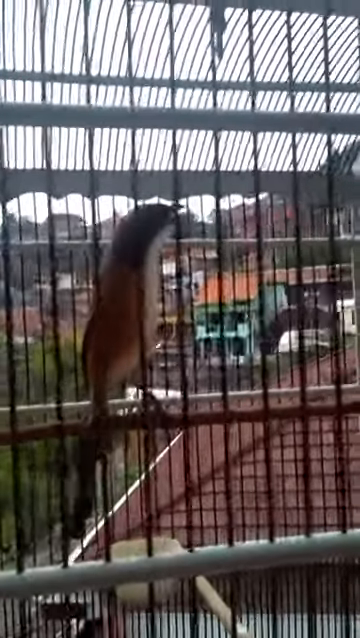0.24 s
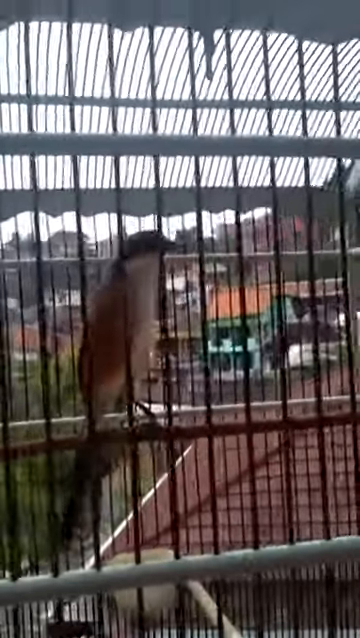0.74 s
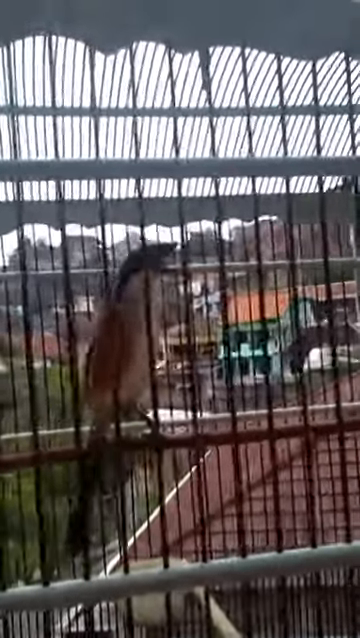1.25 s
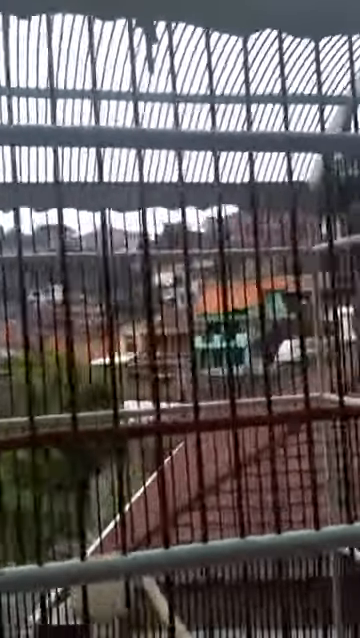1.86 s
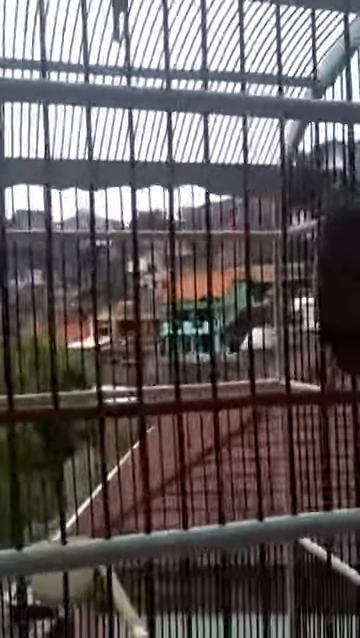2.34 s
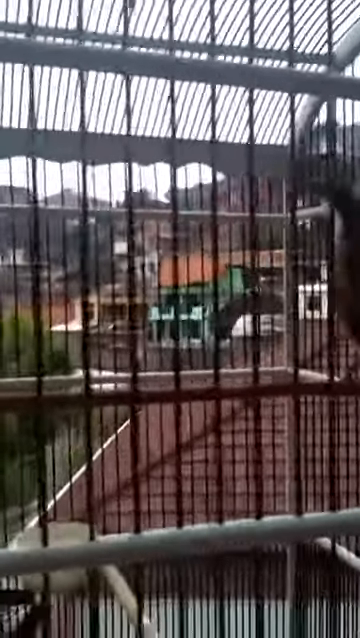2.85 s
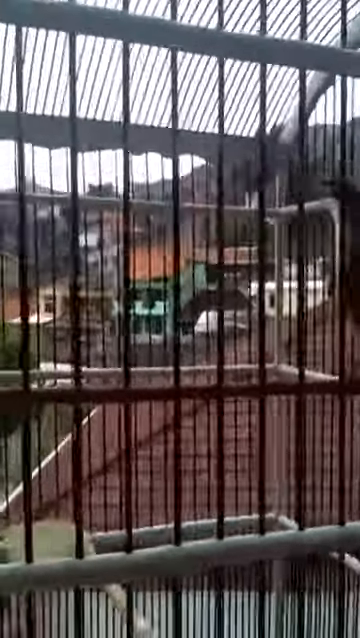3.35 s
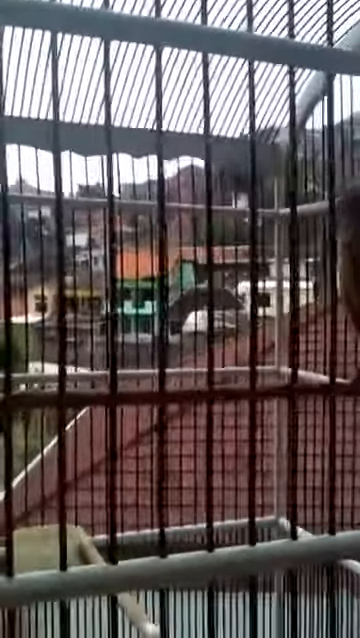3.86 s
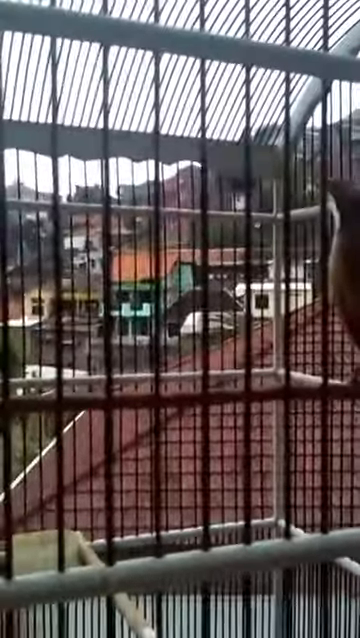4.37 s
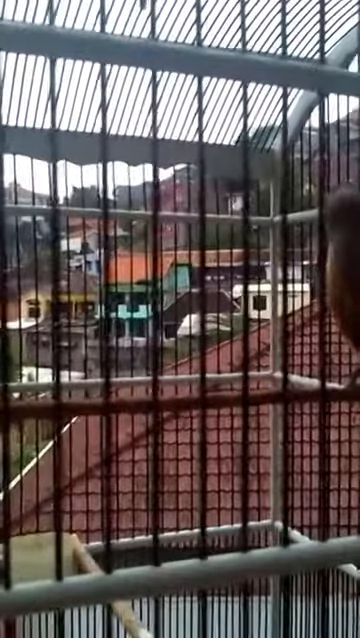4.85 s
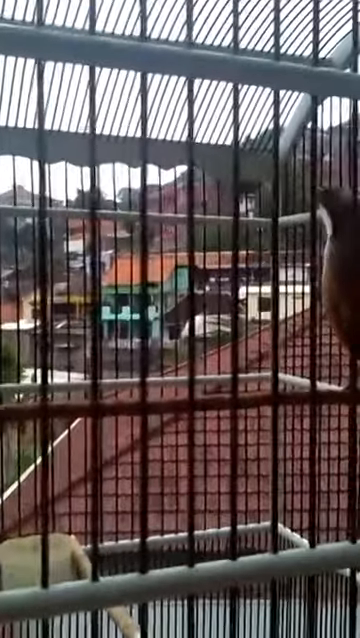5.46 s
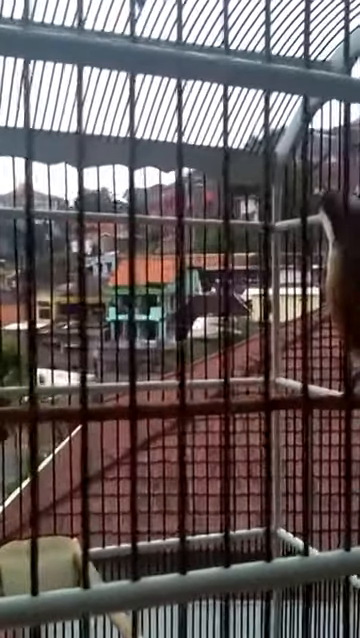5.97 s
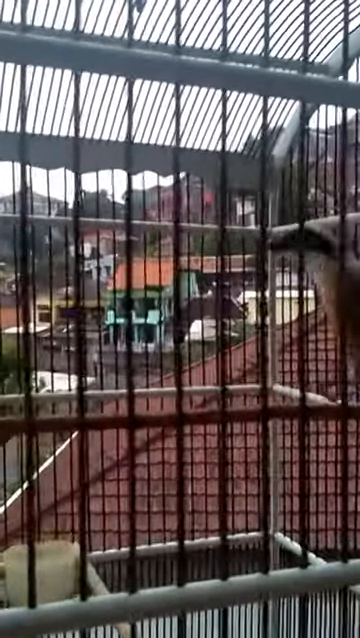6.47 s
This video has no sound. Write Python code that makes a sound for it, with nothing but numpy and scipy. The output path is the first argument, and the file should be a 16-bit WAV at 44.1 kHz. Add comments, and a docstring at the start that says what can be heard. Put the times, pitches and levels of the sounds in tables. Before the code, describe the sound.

A caged bird sings close to the microphone on an open rooftop. It starts with falling slurred whistles and harsh squeezed notes while a second bird whistles slowly in the distance. After a short pause come a hooked whistle and two warbles, then a quick chatter of nasal calls, chips and rasps as the far bird answers again. Two rising whistles finish. Faint town rumble and a soft echo lie underneath.

```python
"""Over the low rumble of a town, a caged shrike on an open rooftop sings close to a small microphone.
It opens with slurred whistles and harsh pressed notes, while a second bird answers from farther off
with slow, wavering whistles. A hooked whistle and two warbles follow, then nasal rising calls, falling
chips, rasps and throbbing flicks as the far bird answers again. Two climbing whistles end the song.
Throughout, walls and roofs send back a soft echo."""
import sys
import numpy as np
from scipy import signal
from scipy.fft import rfft, irfft, next_fast_len
from scipy.io import wavfile
from scipy.ndimage import uniform_filter1d, map_coordinates

SR = 44100
rng = np.random.default_rng(int(sys.argv[2]) if len(sys.argv) > 2 else 0)


def transcribe(signal):
    """Save signal, clipped to [-1, 1], as a 16-bit WAV file at the path in sys.argv[1]."""
    frames = np.atleast_2d(signal).T
    limited = np.clip(frames, -1, 1)
    pcm = np.round(limited * 32767).astype(np.int16)
    wavfile.write(sys.argv[1], SR, pcm)


N = 295911
LEAD = SR // 8  # the song has begun before the first sample heard
SPAN = N + LEAD
TOP_HZ = 15700


def amp(db):
    """Amplitude ratio: tenfold for every 20 dB."""
    return 10 ** (np.asarray(db) / 20)


def unit_rms(x):
    """Normalisation to a mean power of 1."""
    return x / np.sqrt(np.mean(x ** 2) + 1e-20)


def along(points, hz):
    """Interpolation of (frequency_hz, value) points on a logarithmic frequency axis."""
    point_hz, values = np.transpose(points)
    return np.interp(np.log(hz + 1), np.log(point_hz + 1), values)


def wobble(rate_hz):
    """Random modulation: a smooth curve through rate_hz knots a second."""
    knots = rng.standard_normal(int(SPAN * rate_hz / SR) + 4)
    return map_coordinates(knots, [np.arange(SPAN) * rate_hz / SR])


def filtered(x, response):
    """Linear filtering: the spectrum times a complex frequency response."""
    size = next_fast_len(SPAN + SR // 2)
    return irfft(rfft(x, size) * response(np.fft.rfftfreq(size, 1 / SR)), size)[:len(x)]


def noise(spectrum):
    """Spectral shaping: white noise becomes coloured noise of rms 1."""
    return unit_rms(filtered(rng.standard_normal(SPAN), lambda hz: amp(along(spectrum, hz))))


def add(track, start_s, x):
    """Superposition: a sound adds to the track from its start time."""
    part = track[LEAD + round(start_s * SR):][:len(x)]
    part += x[:len(part)]


def fade(t, rise_s, fall_s):
    """Amplitude envelope with linear attack and release."""
    return np.clip(t / rise_s, 0, 1) * np.clip((t[-1] - t) / fall_s, 0, 1)


def tone(hz, partials, jitter):
    """Harmonic series of (multiple, level_db) partials; the higher, the less steady."""
    out = 0
    for k, db in partials:
        shake = unit_rms(uniform_filter1d(rng.standard_normal(len(hz)), size=30))
        partial_hz = k * hz * (1 + jitter * (k - .5) * shake)
        phase = 2 * np.pi * np.cumsum(partial_hz) / SR + rng.uniform(0, 2 * np.pi)
        out = out + amp(db) * np.sin(phase) * (k * hz < TOP_HZ)
    return np.sqrt(2) * out


def note_curves(rows):
    """Smoothed contours: time from the note's start, then pitch and level at every sample."""
    times, *columns = np.transpose(rows)
    t = np.arange(round((times[-1] - times[0]) * SR)) / SR
    curves = [np.interp(t + times[0], times, column) for column in columns]
    return t, [uniform_filter1d(curve, size=130, mode="nearest") for curve in curves]


# Spectra of traffic and air, and of a far engine: frequency_hz, relative_density_db
TRAFFIC_SPECTRUM = [(15, -25.5), (60, -17), (110, -16.5), (250, -22), (580, -31.5), (2700, -35),
                    (4600, -31.5), (7100, -46.5), (15600, -44)]
ENGINE_SPECTRUM = [(115, -59.5), (135, -10), (165, -10.5), (185, -55)]

def town():
    """Ambient noise: distant traffic and air drift slowly over an engine's narrow-band hum."""
    traffic = amp(-64.5 + wobble(4.4) / 3) * noise(TRAFFIC_SPECTRUM)
    engine = amp(-69.5 + 0.29 * wobble(0.9)) * noise(ENGINE_SPECTRUM)
    return traffic + engine


# Reverberation time among the roofs: frequency_hz, t60_s
ROOF_DECAY = [(2000, 0.78), (4500, 0.43), (6000, 0.7), (8000, 0.78), (13000, 0.67)]

def roof_echo(x):
    """Reverberation: sound from walls and roofs decays exponentially, each frequency at its own rate."""
    hz, t, bands = signal.stft(rng.standard_normal(SR), SR, nperseg=256)
    decay = amp(-60 * t / along(ROOF_DECAY, hz)[:, None])
    tail = signal.istft(bands * decay, SR, nperseg=256)[1]
    return signal.fftconvolve(np.pad(x, (250, 0)), tail / np.linalg.norm(tail))[:SPAN]


# Reflections from near surfaces: delay_s, gain_db
REFLECTIONS = [(.0022, -23), (.0043, -13.5), (0.0116, -11), (0.025, -19), (0.033, -20)]

def with_reflections(x):
    """Interference: the direct sound sums with delayed copies off cage, ledge and wall."""
    return x + sum(amp(db) * np.pad(x, (round(delay_s * SR), 0))[:SPAN] for delay_s, db in REFLECTIONS)


# The far bird's notes: start_s, length_s, start_hz, end_hz, glide_s, level_db, unsteadiness_ratio
FAR_NOTES = [(0.354, 0.33, 2675, 3627, 0.27, -43, 0.01), (0.794, 0.18, 3700, 3654, 0.096, -40.5, 0.02),
             (1.047, 0.16, 3364, 2760, 0.14, -41.5, 0.02), (1.322, 0.15, 3470, 3288, 0.062, -43, 0.04),
             (1.565, .13, 2199, 2786, .14, -41.5, 0.04), (4.042, 0.31, 2704, 3613, 0.26, -43.5, 0),
             (4.48, 0.14, 3680, 3750, 0.056, -43.5, 0.01), (4.601, 0.088, 3625, 3562, 0.079, -40, 0.05),
             (4.778, 0.15, 3326, 2710, 0.09, -38.5, 0.01), (5.047, 0.1, 3350, 3280, 0.056, -40, 0.02),
             (5.298, 0.154, 2280, 2671, 0.13, -44.5, .08)]

def far_bird():
    """Frequency modulation: whistles glide, settle and trill; their level flickers through the air."""
    out = np.zeros(SPAN)
    trill_hz, trill_depth = 67.9, .6
    for start_s, length_s, start_hz, end_hz, glide_s, db, unsteady in FAR_NOTES:
        t = np.arange(round(length_s * SR)) / SR
        hz = end_hz + (start_hz - end_hz) * np.clip(1 - t / glide_s, 0, 1) ** 1.7
        hz *= 1 + trill_depth * unsteady * np.sin(2 * np.pi * trill_hz * t)
        swell = amp(db) * fade(t, 0.38 * length_s, 0.052)
        add(out, start_s, swell * tone(hz, [(1, 2.0), (2, -24.5), (3, -36.5)], jitter=unsteady))
    return out * amp(2.5 * wobble(45) + 1.8 * wobble(200))


# Resonances of throat and beak at a gape of 1: centre_hz, width_hz, gain_db
THROAT_MODES = [(2740, 2500, -14), (5020, 514, 3.5), (8300, 8700, -36.5)]

def throat(x, gape):
    """Resonance: mode frequencies scale with the gape; white noise keeps its power."""
    def response(hz):
        f = hz / gape
        modes = sum((-1) ** k * amp(db) * 1j * f * width / (centre ** 2 - f ** 2 + 1j * f * width)
                    for k, (centre, width, db) in enumerate(THROAT_MODES))
        return modes / (1 + (1700 / (hz + 1)) ** 8)  # little passes below the beak's range
    mean_power = np.mean(np.abs(response(np.linspace(0, SR / 2, num=999))) ** 2)
    return filtered(x, response) / np.sqrt(mean_power)


# The shrike's rasps: start_s, level_db
RASP_NOTES = [(3.963, -29.5), (4.571, -30), (5.455, -30.5)]

def rasps():
    """Modulated noise: two clicks, then air chopped unevenly while the beak opens."""
    gate, opening = np.zeros((2, SPAN))
    length_s, chop_hz = 0.069, 190
    t = np.arange(round(length_s * SR)) / SR
    clicks = amp(-2.5) * np.exp(-t / 0.01) + amp(6) * (t > .01) * np.exp(-np.abs(t - .01) / 0.0043)
    body = np.sin(np.pi * np.clip((t - .012) / (length_s - .012), 0, 1) ** 1.06)
    for start_s, db in RASP_NOTES:
        chop = 1.73 + np.sin(np.pi * (chop_hz * t + rng.uniform())) ** 4
        add(gate, start_s, amp(db - 3.5) * (clicks + body * chop))
        add(opening, start_s, np.pi / 2 * np.clip((t - .01) / 0.033, 0, 1))
    air = gate * amp(1.43 * wobble(400)) * rng.standard_normal(SPAN)
    return throat(air * np.cos(opening), gape=0.74) + throat(air * np.sin(opening), gape=0.92)


# What the open beak passes: frequency_hz, gain_db
BEAK_RESPONSE = [(1400, -31.5), (2800, -10), (3800, -3.5), (4700, -0.5), (5400, -10), (6200, -20),
                 (8500, -19.5), (10000, -35.5), (15000, -28)]

def beak_tone(hz, step_db, jitter):
    """Source and filter: harmonics, each step_db from the last, are weighted by the beak."""
    partials = [(k, (k - 1) * step_db + along(BEAK_RESPONSE, k * hz)) for k in range(1, 12)]
    return tone(hz, partials, jitter)


# Nasal calls: start_s, length_s, level_db
NASAL_NOTES = [(3.467, 0.059, -31), (3.788, 0.062, -32), (4.399, .058, -32), (5.285, 0.058, -31.5)]

def nasal_calls():
    """Loss of periodicity: a rich tone bends up, sags and ends hoarse with jitter and air noise."""
    out, air = np.zeros((2, SPAN))
    for start_s, length_s, db in NASAL_NOTES:
        t = np.arange(round(length_s * SR)) / SR
        progress = t / length_s
        hz = 950 + 480 * np.sin(np.pi * .74 * progress ** 0.91)
        voice = beak_tone(hz, step_db=-0.25, jitter=0.0036 + 0.0049 * progress ** 6)
        add(out, start_s, amp(db + 6.3 * progress) * fade(t, 0.016, 0.017) * voice)
        add(air, start_s, amp(db + 3.5) * (0.031 + 1.12 * progress ** 4) * fade(t, 0.013, 0.0094))
    return out * amp(0.84 * wobble(240)) + throat(air * rng.standard_normal(SPAN), gape=0.91)


# Falling chips: start_s, start_hz, end_hz, level_db, partial_step_db
CHIP_NOTES = [(3.648, 3510, 1757, -24.5, -7), (4.156, 3420, 1902, -22.5, -2),
              (4.244, 3530, 2048, -24, -1.5), (4.751, 3510, 2054, -25.5, 0),
              (4.835, 4760, 2728, -21.5, -3.5), (4.944, 4600, 3227, -17.5, -17.5),
              (5.641, 3940, 2085, -23.5, -0.5), (5.725, 5030, 2450, -23, -1.5),
              (5.828, 4810, 3258, -15, -17.5)]

def chips():
    """Tension sets pitch: the membrane slackens, the pitch drops, and overtones enter as it settles."""
    out = np.zeros(SPAN)
    t = np.arange(round(0.037 * SR)) / SR
    settle_s, decay_db_per_s = .005, 415
    for start_s, start_hz, end_hz, db, step_db in CHIP_NOTES:
        hz = end_hz + (start_hz - end_hz) * np.exp(-t / settle_s)
        voice = beak_tone(hz, step_db - 48 * (hz / end_hz - 1) ** 2, jitter=.01)
        add(out, start_s, amp(db - decay_db_per_s * t) * fade(t, 0.0082, 0.0056) * voice)
    return out * amp(1.5 * wobble(250))


# Contour of a pressed note: time_s, pitch_hz, level_db
PRESSED_CONTOUR = [(0, 5250, -51), (.017, 4720, -30.5), (.03, 4490, -23), (0.045, 4400, -25),
                   (.057, 4000, -28.5), (.068, 3230, -30), (0.092, 3100, -33), (0.11, 2856, -35),
                   (0.129, 2480, -45)]
# Each pressed note: start_s, gain_db, break_s, quaver_hz
PRESSED_NOTES = [(-.087, -1, 0.06, 5), (1.059, 1, 0.077, 5), (1.349, 1.5, .064, 5), (1.628, -1, 0.062, 700)]
# Its octave against its fundamental: pitch_hz, gain_db
PRESSED_OCTAVE = [(2450, -3), (2920, 9), (3150, -0.5), (3300, -8), (4000, -23.5), (4500, -37.5)]
# Its air noise: frequency_hz, relative_density_db
BREATH_SPECTRUM = [(1500, -28.5), (3000, -25), (6000, 2.5), (10000, -11.5), (15000, -19)]

def pressed_notes():
    """Harmonic enrichment: as the pitch breaks downward, octave, third partial and air grow together."""
    out, air = np.zeros((2, SPAN))
    contour_break_s, end_s = .068, PRESSED_CONTOUR[-1][0]
    quaver_period_s, quaver_decay_s, quaver_hz_per_db = .023, .022, 90
    for start_s, gain_db, break_s, quaver_hz in PRESSED_NOTES:
        rows = np.array(PRESSED_CONTOUR)
        rows[:, 0] = np.interp(rows[:, 0], [0, contour_break_s, end_s], [0, break_s, end_s])
        t, (hz, db) = note_curves(rows)
        quaver = quaver_hz * np.exp(-t / quaver_decay_s)  # the opening starts low, louder, and swings
        hz -= quaver * (2 + np.cos(2 * np.pi * t / quaver_period_s)) / 3
        octave_db = along(PRESSED_OCTAVE, hz)
        partials = [(1, 0.028), (2, octave_db), (3, 0.63 * octave_db - 21.5)]
        swell = amp(db + gain_db + quaver / quaver_hz_per_db) * fade(t, 0.0015, 0.0021)
        add(out, start_s, swell * tone(hz, partials, jitter=0.012))
        add(air, start_s, swell * amp(0.85 * octave_db - 10.5))
    return out * amp(0.61 * wobble(220)) + air * noise(BREATH_SPECTRUM)


# Whistled motifs, one contour per voice: time_s, pitch_hz, level_db
SLUR_MOTIF = [
    [(0, 5000, -51.5), (.014, 4950, -37), (.03, 4150, -25), (.047, 3745, -26.5), (.062, 3755, -21.5),
     (.092, 3640, -28.5), (.108, 3170, -35), (.124, 2390, -47)],
]  # drops, holds, drops away
HOOK_MOTIF = [
    [(0, 5020, -58), (.017, 4750, -30), (.034, 4170, -22.5), (.054, 3807, -30), (.089, 3805, -29.5),
     (.109, 4450, -29.5), (.129, 3850, -38.5), (.136, 3560, -19), (.151, 3160, -34.5)],
]  # a slur that flips up before it ends
WARBLE_MOTIF = [
    [(0, 5250, -41.5), (.029, 5617, -40), (.052, 4380, -17.5), (.071, 3850, -38.5), (.089, 3540, -24)],
    [(.001, 4990, -47.5), (.011, 3950, -34), (.029, 3600, -40.5), (.049, 3260, -33.5)],
    [(.062, 4687, -34), (.074, 5230, -41), (.095, 4540, -32.5), (.117, 4478, -22.5), (.132, 3750, -27.5),
     (.147, 3327, -20.5)],
]  # three overlapping falls
FLICK_MOTIF = [
    [(0, 1246, -61.5), (.012, 2147, -56), (.024, 2954, -33)],
    [(.034, 1312, -57), (.044, 2095, -36.5), (.053, 4665, -40.5), (.058, 4333, -39), (.062, 4800, -41),
     (.071, 3593, -29), (.084, 3313, -29.5), (.097, 3010, -31.5)],
]  # a faint upstroke, a sharp one, a fall
RISE_MOTIF = [
    [(0, 1674, -68), (.019, 2760, -56), (.041, 3940, -53.5), (.08, 4400, -47), (.118, 5107, -31.5),
     (.134, 5860, -29)],
    [(.126, 6000, -35), (.134, 6590, -34), (.142, 6536, -33), (.164, 6370, -37)],
]  # a long climb, capped by the other side of the voice
GRACE_CONTOUR = [(.414, 4110, -38.5), (.426, 4062, -34), (.44, 3580, -25.5)]  # the other side joins the first slur's end
# Each time a motif is sung: start_s, gain_db, pitch_ratio, length_ratio
SLURS_SUNG = [(.328, -0.5, 1.002, .99), (.79, 0.5, .998, 1.01)]
HOOKS_SUNG = [(2.266, 0, 1, 1)]
WARBLES_SUNG = [(2.547, 0.22, 1.002, 1.005), (2.83, -0.42, .998, .995)]
FLICKS_SUNG = [(5.057, 0.66, 1.01, .98), (5.94, -1.5, .99, 1.02)]
RISES_SUNG = [(6.155, 2, .998, 1.014), (6.452, 5.5, 1.045, .89)]
# The throat's colouring of overtones and air noise: frequency_hz, gain_db
WHISTLE_COLOUR = [(5500, -42.5), (6500, -31.5), (7500, -27), (9000, -43), (11300, -22.5), (13500, -37),
                  (15500, -44)]

def whistles():
    """Two sources: the two sides of the voice sing near-pure glides, with faint air noise."""
    out, air = np.zeros((2, SPAN))
    song = [(SLUR_MOTIF, SLURS_SUNG, .016), (HOOK_MOTIF, HOOKS_SUNG, .017),
            (WARBLE_MOTIF, WARBLES_SUNG, .018), (FLICK_MOTIF, FLICKS_SUNG, .07),
            (RISE_MOTIF, RISES_SUNG, .02)]
    notes = []
    for motif, repeats, jitter in song:
        for start_s, gain_db, pitch, length in repeats:
            for contour in motif:
                notes.append((np.multiply(contour, [length, pitch, 1]) + [start_s, 0, gain_db], jitter))
    for rows, jitter in notes + [(GRACE_CONTOUR, .03)]:
        start_s = rows[0][0]
        t, (hz, db) = note_curves(rows)
        swell = amp(db) * fade(t, 0.0012, 0.0035)
        partials = [(1, 0.58), (2, along(WHISTLE_COLOUR, 2 * hz)),
                    (3, along(WHISTLE_COLOUR, 3 * hz) - 14)]
        add(out, start_s, swell * tone(hz, partials, jitter))
        add(air, start_s, swell * amp(-37.5))
    return out * amp(0.61 * wobble(220)) + air * noise(WHISTLE_COLOUR)


def throbbing():
    """Amplitude modulation: a gain that flutters quickly and unevenly as each flick falls."""
    depth = np.zeros(SPAN)
    from_s, to_s = 0.072, .098
    for start_s, _, _, length in FLICKS_SUNG:
        add(depth, start_s + from_s * length, np.full(round((to_s - from_s) * length * SR), 0.78))
    throb_hz = 230 * (1 + 0.16 * wobble(90))
    return 1 + uniform_filter1d(depth, size=150) * np.cos(2 * np.pi * np.cumsum(throb_hz) / SR)


def scene():
    """Direct and reverberant sound add over the town; the far bird has the greater share of echo."""
    near = (whistles() + pressed_notes() + chips()) * throbbing() + nasal_calls() + rasps()
    far = far_bird()
    return (with_reflections(near + far) + roof_echo(amp(-10.5) * near + far) + town())[None, LEAD:]


def record(dry):
    """Intermodulation: loud sound times its recent past gives a haze of sum tones; all is band-limited."""
    x = dry[0]
    memory_t60_s, haze_above_hz = 0.33, 6200
    memory = rng.standard_normal(SR // 10) * amp(-60 * np.arange(SR // 10) / SR / memory_t60_s)
    recent = signal.fftconvolve(x, memory / np.linalg.norm(memory))[:N]
    products = 0.37 * x * recent + 2.5 * x ** 2 * recent
    haze = filtered(products, lambda hz: 1 / (1 + (haze_above_hz / (hz + 1)) ** 8))
    return filtered(x + haze, lambda hz: (hz < TOP_HZ) / (1 + (hz / 15200) ** 20))[None]


dry = scene()
out = record(dry)
transcribe(out)
```